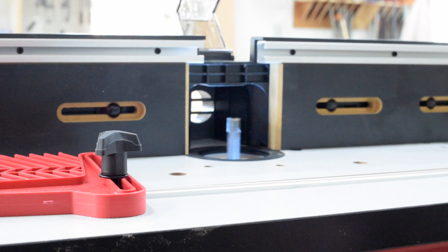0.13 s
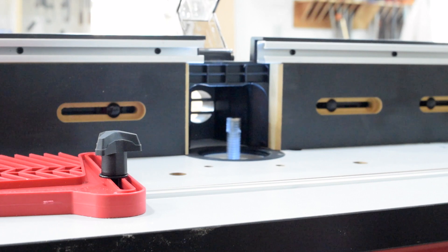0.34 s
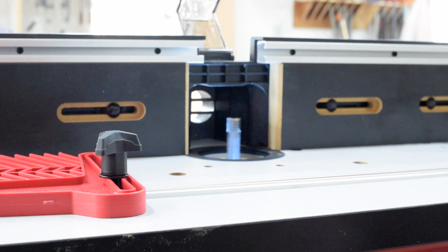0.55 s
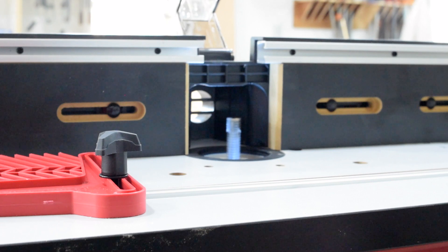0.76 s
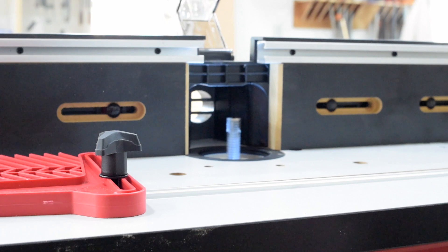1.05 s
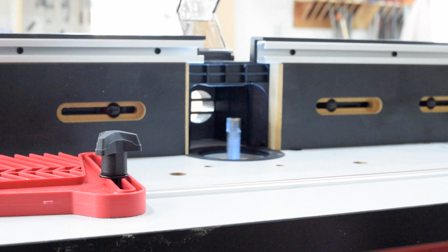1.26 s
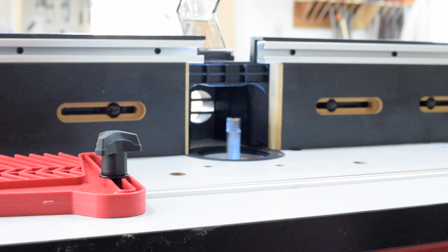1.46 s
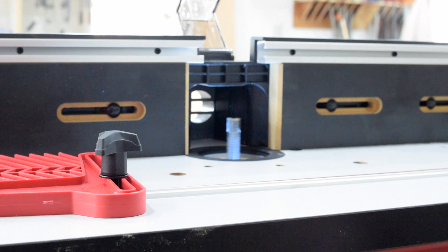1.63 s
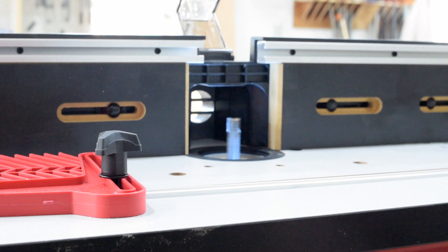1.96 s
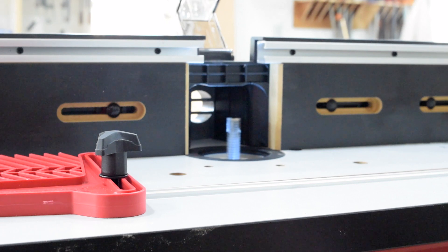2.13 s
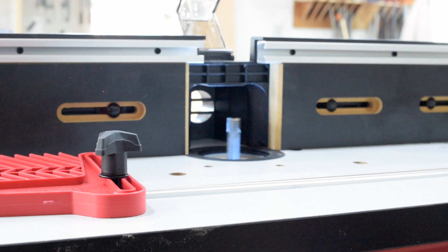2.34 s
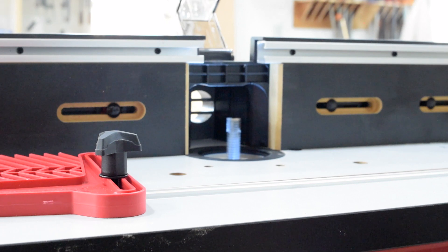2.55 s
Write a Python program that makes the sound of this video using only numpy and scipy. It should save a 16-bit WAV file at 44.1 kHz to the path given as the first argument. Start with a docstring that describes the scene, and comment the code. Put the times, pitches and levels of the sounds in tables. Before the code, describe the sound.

A table-mounted router runs up to full speed, whining and humming through a loud rush of air.

```python
"""In a workshop, a router spins freely under a table, nearing full speed within the first second.
The shaft hums with its overtones and the cooling fan whines at its blade rate: tones locked to one
turning angle. Its air rushes through the ringing hollows of housing and fence: noise shaped by
broad spectra and resonances. The hiss slowly dulls. Heard close up, in mono."""
import sys
import numpy as np
from scipy import signal
from scipy.fft import rfft, irfft
from scipy.io import wavfile

SR = 44100
rng = np.random.default_rng(int(sys.argv[2]) if len(sys.argv) > 2 else 0)


def wrap_up_sound(samples):
    """Save the sound to the file named by the first command line argument, as 16-bit audio."""
    columns = np.atleast_2d(samples).T
    # keep every value between -1 and 1, then stretch to whole-number steps
    tamed = np.clip(columns, -1, 1)
    steps = np.round(tamed * 32767).astype(np.int16)
    wavfile.write(sys.argv[1], SR, steps)


N = 119070  # length in samples

# sizes in dB, rates in wavers per second
OVERTONE_FLUTTER_DB, WHINE_FLUTTER_DB, HUM_FLUTTER_DB, FLUTTER_PER_S = 1.7, 1.5, 1.26, 18.6
WHINE_GRAIN_DB, WHINE_GRAIN_PER_S = 3, 110  # eddies at the blades roughen the whine
RING_FLUTTER_DB, RING_FLUTTER_PER_S = 1.15, 13  # each resonance swells and sinks on its own
TURBULENCE_DB, TURBULENCE_PER_S = 1, 25  # each broad noise wavers
GUST_DB, GUST_PER_S = 0.49, 22  # the whole air stream shivers


def motor():
    """The turning shaft drives both the hum and the fan, so all their tones share one angle."""
    # speed of the shaft: start_s, turns_per_s
    speed_curve = [(0, 320.7), (.1, 333), (.2, 343.6), (.45, 367), (.6, 379), (.8, 392.6), (.9, 396.5),
                   (1.07, 401.1), (1.4, 403.9), (1.7, 404.95), (2.27, 406.1), (2.7, 406.3)]
    speed_wander = 0.00019  # share of the speed
    speed = in_time(speed_curve) * (1 + speed_wander * drift(FLUTTER_PER_S))
    angle = 2 * np.pi * np.cumsum(speed) / SR
    return shaft_hum(angle, speed) + fan_whine(angle)


def shaft_hum(angle, speed):
    """The shaft hums once per turn; tones at multiples of that pitch grow as it speeds up."""
    # level of the once-per-turn hum: start_s, level_db
    hum_curve = [(0, -58), (.25, -40), (.55, -33), (.8, -36), (.95, -50), (1.1, -34), (1.27, -28),
                 (1.9, -28), (2.35, -26.5), (2.7, -25)]
    # overtones of the shaft at full speed: multiple (of the turning rate), level_db
    overtone_rows = [(2, -29), (3, -43), (4, -46)]
    growth_db_per_octave = 14
    effort_db = growth_db_per_octave * np.log2(speed / speed.max())
    total = tone(angle, in_time(hum_curve), HUM_FLUTTER_DB)
    for multiple, level_db in overtone_rows:
        total = total + tone(round(multiple) * angle, level_db + effort_db, OVERTONE_FLUTTER_DB)
    return total


def fan_whine(angle):
    """Each passing blade pushes the air, which whines at the blade rate and faintly an octave up."""
    # level of the whine, before its roughness: start_s, level_db
    whine_curve = [(0, -27.5), (.12, -27), (.25, -35), (.39, -46), (.52, -29), (.62, -27), (.71, -43),
                   (.8, -29), (.93, -34), (1.02, -27), (1.14, -42), (1.27, -24.5), (1.39, -27.5),
                   (1.73, -29), (1.9, -35.5), (2.25, -34.5), (2.48, -52), (2.68, -32)]
    blades, octave_db = 18, -61
    rough_db = in_time(whine_curve) + WHINE_GRAIN_DB * drift(WHINE_GRAIN_PER_S)
    whine = tone(blades * angle, rough_db, WHINE_FLUTTER_DB)
    octave = tone(2 * blades * angle, octave_db, OVERTONE_FLUTTER_DB)
    return whine + octave


def tone(angle, db, flutter_db):
    """One sine locked to the shaft, with a fluttering level and a random starting point."""
    gain = from_db(db + flutter_db * drift(FLUTTER_PER_S))
    # the square root of 2 makes the level an rms level
    return np.sqrt(2) * gain * np.sin(angle + rng.uniform(0, 2 * np.pi))


def air():
    """The cooling air sounds in several ways, and the whole stream shivers together."""
    stream = howl() + rush() + hiss() + sizzle() + rumble()
    return stream * from_db(GUST_DB * drift(GUST_PER_S))


def howl():
    """Air blows the loudest hollow, which howls on its own and eases sooner."""
    # its resonances, before the level curve: centre_hz, width_hz, level_db (rms)
    howl_rings = [(1120, 136, -26), (1194, 101, -23.5), (1231, 50, -29.5)]
    # change of level: start_s, level_db
    howl_curve = [(0, 0), (.65, 1), (1.0, -.7), (1.7, -0.2), (1.9, -6), (2.1, -3), (2.38, -4), (2.52, -7.5),
                  (2.7, -2)]
    return from_db(in_time(howl_curve)) * resonant(howl_rings)


def rush():
    """Air blows the hollows of housing, table and fence, and each one rings at its own pitch."""
    # the hollows, before the level curve: centre_hz, width_hz, level_db (rms)
    hollow_rings = [(175, 22, -59), (593, 47, -32.5), (645, 38, -34), (777, 44, -37.5), (867, 64, -28),
                    (964, 101, -27), (1578, 53, -43.5), (1939, 99, -31.5), (2146, 99, -31),
                    (2352, 194, -24.5), (2560, 185, -26), (2875, 230, -26.5), (3050, 130, -30.5),
                    (3192, 102, -24.5), (3374, 230, -24), (3784, 43, -31.5), (3920, 150, -28),
                    (5540, 350, -29.5)]
    # change of level: start_s, level_db
    rush_curve = [(0, 0), (.6, -0.1), (1.0, -0.5), (1.35, 0), (1.75, -0.5), (2.0, -1), (2.38, -1.5),
                  (2.53, -5), (2.7, -3.5)]
    return from_db(in_time(rush_curve)) * resonant(hollow_rings)


def hiss():
    """Turbulent air hisses at the vents, whose higher, narrower passages ring with it."""
    # broad spectrum, before the level curve: pitch_hz, level_db (per Hz)
    hiss_spectrum = [(700, -95), (1300, -61), (1480, -60.5), (1700, -56), (3600, -64), (4150, -61.5),
                     (5200, -61), (7000, -65), (9000, -73.5), (10000, -81), (16000, -105)]
    # ringing passages, before the level curve: centre_hz, width_hz, level_db (rms)
    vent_rings = [(4270, 130, -39), (4710, 190, -35), (5010, 150, -33.3), (5570, 450, -28.5),
                  (6030, 260, -30.5), (6450, 220, -39), (7100, 250, -38), (7570, 230, -35.5),
                  (8040, 260, -36.5), (8400, 280, -38), (8780, 400, -33.5), (9380, 350, -36.5)]
    # change of level: start_s, level_db
    hiss_curve = [(0, -1.5), (.55, 0.5), (1.1, 1), (1.45, -0.4), (1.7, -2.5), (1.87, -4), (2.13, -4.5),
                  (2.3, -9), (2.45, -8.5), (2.7, -10)]
    return from_db(in_time(hiss_curve)) * (broad(hiss_spectrum) + resonant(vent_rings))


def sizzle():
    """The top treble of the air: broad noise with resonances of its own."""
    # broad spectrum, before the level curve: pitch_hz, level_db (per Hz)
    sizzle_spectrum = [(5000, -78), (8500, -60), (9800, -67), (11400, -74.5), (12700, -73), (13600, -72),
                       (14500, -75.5), (15700, -82)]
    # resonances, before the level curve: centre_hz, width_hz, level_db (rms)
    sizzle_rings = [(10280, 360, -36), (11080, 280, -40.5), (11860, 400, -39.5), (12650, 500, -39.5)]
    # change of level: start_s, level_db
    sizzle_curve = [(0, -3.5), (.45, 0), (1.0, -1.5), (1.3, -3), (1.5, -8), (1.85, -11), (2.1, -11),
                    (2.3, -14.5), (2.7, -14)]
    return from_db(in_time(sizzle_curve)) * (broad(sizzle_spectrum) + resonant(sizzle_rings))


def rumble():
    """The steady, broad rumble of the turbulent air."""
    # broad spectrum, before the overall gain: pitch_hz, level_db (per Hz)
    rumble_spectrum = [(25, -86), (60, -81), (100, -86), (140, -82.5), (210, -66), (300, -60.5), (460, -56),
                       (530, -57.5), (900, -55), (1400, -84.5), (2400, -70.5), (3800, -61), (4400, -103),
                       (16000, -110)]
    return from_db(-0.5) * broad(rumble_spectrum)


def broad(points):
    """Turbulent air as noise with a smooth spectrum and a wavering level."""
    hz = np.maximum(np.fft.rfftfreq(N, 1 / SR), 1)  # at least 1 Hz, for the logarithm
    point_hz, point_db = np.transpose(points)
    level_db = np.interp(np.log(hz), np.log(point_hz), point_db)
    return noise(from_db(level_db) ** 2) * from_db(TURBULENCE_DB * drift(TURBULENCE_PER_S))


def resonant(rows):
    """Noise ringing in steep-sided resonances; widths lie between the half-power points."""
    hz, total = np.fft.rfftfreq(N, 1 / SR), 0
    for centre_hz, width_hz, level_db in rows:
        spread = .5 * width_hz / np.sqrt(np.sqrt(2) - 1)
        # the area under this peak is 1, so the level sets its total power
        power = 2 / (np.pi * spread) / (1 + ((hz - centre_hz) / spread) ** 2) ** 2
        gain = from_db(level_db + RING_FLUTTER_DB * drift(RING_FLUTTER_PER_S))
        total = total + gain * noise(power)
    return total


def noise(power):
    """Random noise, filtered to the given power per Hz."""
    spectrum = rfft(rng.standard_normal(N))
    return irfft(spectrum * np.sqrt(power * SR / 2), N)


def drift(rate):
    """A slow random wavering around 0 with a spread of about 1; a higher rate wavers faster."""
    step = 40  # samples between the computed points
    memory = np.exp(-2 * np.pi * step * rate / SR)
    white = rng.standard_normal(N // step + 2002)
    smooth = signal.lfilter([1], [1, -2 * memory, memory * memory], white)
    slow = smooth[2000:]  # the filter has settled by here
    return np.interp(np.arange(N) / step, np.arange(len(slow)), slow / slow.std())


def in_time(rows):
    """A control curve at every sample, with straight lines between its points."""
    return np.interp(np.arange(N) / SR, *np.transpose(rows))


def from_db(db):
    """Decibels to gain: 20 dB is a factor of ten."""
    return 10 ** (np.asarray(db) / 20)


def scene():
    """Motor and air together, alike in both channels."""
    return np.tile(motor() + air(), (2, 1))


def record(dry):
    """The rare highest peaks are rounded, the bass is thinned, the top is cut steeply."""
    ceiling, low_cut_hz, high_cut_hz = .9, 175, 15730
    rounded = dry / (1 + (dry / ceiling) ** 12) ** (1 / 12)
    bass_cut = signal.butter(2, low_cut_hz, "high", fs=SR, output="sos")
    thin = signal.sosfilt(bass_cut, rounded)
    top_cut = signal.ellip(12, .05, 60, high_cut_hz, fs=SR, output="sos")
    return signal.sosfiltfilt(top_cut, thin)  # run forwards and backwards


dry = scene()
out = record(dry)
wrap_up_sound(out)
```